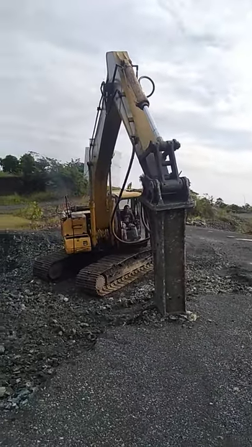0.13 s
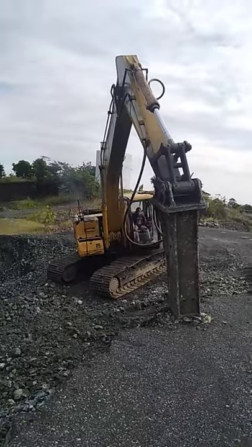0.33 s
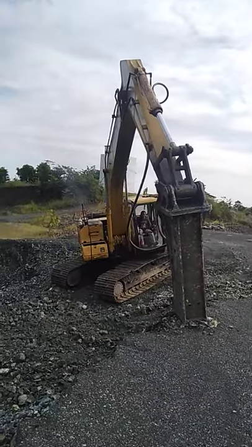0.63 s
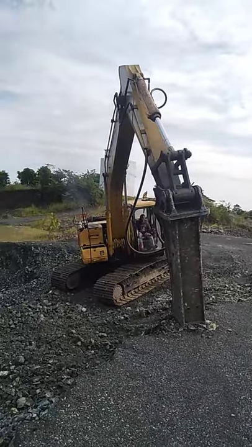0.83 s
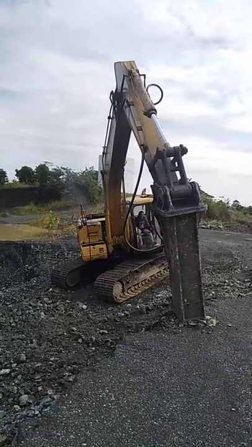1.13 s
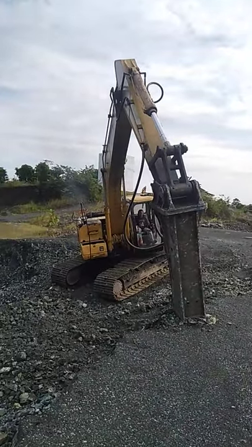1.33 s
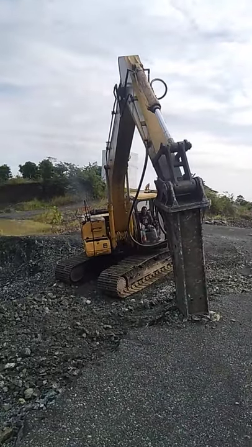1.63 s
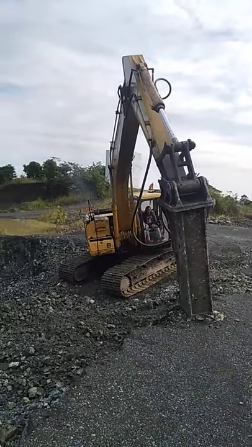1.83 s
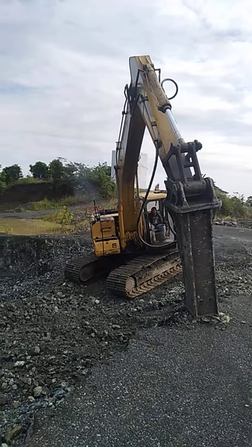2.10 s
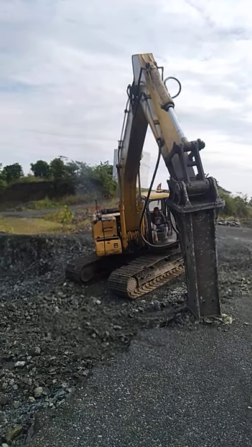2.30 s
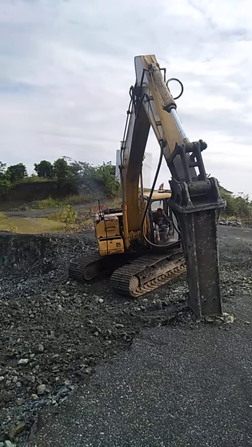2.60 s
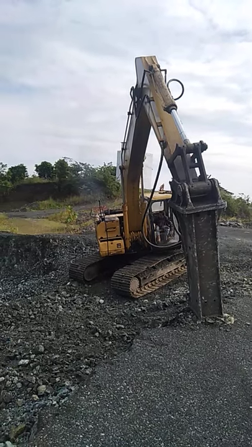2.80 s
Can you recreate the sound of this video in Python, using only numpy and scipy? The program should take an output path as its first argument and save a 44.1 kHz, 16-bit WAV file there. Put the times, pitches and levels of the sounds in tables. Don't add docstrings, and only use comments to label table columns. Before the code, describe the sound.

An excavator's breaker pounds rock about six blows a second, with one grinding skid and groan

```python
import sys
import numpy as np
from scipy import signal
from scipy.io import wavfile

SR = 44100
rng = np.random.default_rng(int(sys.argv[2]) if len(sys.argv) > 2 else 0)


def voltage_ratio(level):
    return 10 ** (np.asarray(level, float) / 20)


def wav_record(signal):
    frames = np.transpose(np.atleast_2d(signal))
    bounded = np.clip(frames, -1, 1)
    quanta = np.round(bounded * 32767).astype(np.int16)
    wavfile.write(sys.argv[1], SR, quanta)


N = 130095

# pitch_hz, density_db (per Hz)
ENGINE_COLOUR = [(15, -48), (25, -20), (197, -3), (979, 11), (1090, -47), (1560, 9.5), (2360, -0.5),
                 (4990, -67), (12000, -28), (15600, -69), (22000, -120)]
# pitch_hz, width_hz, level_db
PANELS = [(165, 42, -47), (562, 85, -47.5), (649, 72, -44), (802, 76, -44), (1220, 53, -48.5),
          (1330, 71, -53), (2253, 110, -43), (3090, 45, -53.5), (3580, 300, -54), (6980, 1040, -53),
          (4350, 280, -55)]
# multiple of the firing rate, level_db
ENGINE_ORDERS = [(1, -56), (2, -56), (4, -51.5)]
# time_s, pitch_hz, level_db
TURBO = [
    (0, 12970, -58),
    (.45, 12900, -57),
    (.6, 12800, -63),
    (1.5, 12680, -63),
    (2.2, 12720, -60),
    (2.95, 12740, -60),
]

# pitch_hz, density_db (per Hz)
VENT_COLOUR = [(880, -41), (1500, -32), (2300, -9.5), (2570, -6.5), (3580, -3.5), (5210, -46), (7440, 8.5),
               (12000, -46), (15600, -64), (22000, -120)]
# pitch_hz, width_hz, level_db
JET = [(13300, 1200, -8), (13900, 500, -3), (15300, 880, -2)]

# start_s, level_db, decay_s
DEBRIS = [
    (0.602, -29, 0.024),
    (.635, -35.5, 0.017),
    (0.797, -22.5, 0.041),
    (0.959, -22.5, 0.052),
    (1.108, -28, 0.052),
]
# pitch_hz, density_db (per Hz)
DEBRIS_COLOUR = [(120, -48), (200, -13.5), (569, 0), (641, -7.5), (1050, -6.5), (2240, -6.5), (4920, -30.5),
                 (12000, -38.5), (15600, -70), (22000, -120)]

# time_s, level_db
SLIP_LEVEL = [
    (0.611, -24.5),
    (0.626, -50),
    (0.638, -32),
    (0.66, -35),
    (0.674, -19.5),
    (0.725, -30),
    (0.772, -39),
    (0.774, -30),
]
# pitch_hz, density_db (per Hz)
SLIP_COLOUR = [(120, -46), (200, -14), (496, 5.5), (660, -12.5), (1610, -1), (1890, 0), (2860, -7),
               (3150, -6.5), (9000, -65), (11700, -68), (19800, -120)]
# pitch_hz, width_hz, level_db
SLIP_RINGS = [(702, 42, 0.5), (1140, 27, 2.5), (1876, 43, 0), (2257, 52, 1), (2910, 70, -8.5),
              (3280, 120, -21), (4160, 230, -11)]
# start_s, level_db
SKID_KNOCKS = [(.6348, -22.5), (.641, -38), (.6745, -17), (.678, -12), (.6826, -13.5), (.687, -14.5),
               (.692, -18.5), (.697, -28), (.703, -21), (.711, -23.5), (.726, -35), (.754, -31)]
# pitch_hz, level_db, delay_ms, swell_ms, t60_s
LOOSE_TOOL = [(690, -3, 0.17, 0.87, 0.026), (990, -12, 0, .6, 0.027), (1520, -10, 0, .4, 0.023),
              (1850, -1.5, 0.039, 0.35, 0.028), (2240, -6, .5, 0.44, .025), (2450, -2.5, 0, .3, 0.025),
              (2860, -4, .5, 0.33, 0.024), (3320, -18, 0.21, .2, .015), (3600, -12, 0.062, .2, .015),
              (4660, -11, 0.48, .2, 0.015)]

# pitch_hz, density_db (per Hz)
CRUNCH_COLOUR = [(35, -42), (60, -53), (208, -5.5), (493, -6.5), (1090, -10), (1490, -8), (2040, -6),
                 (4400, -26.5), (5400, -74), (12000, -50), (22000, -120)]

BLOW_S = [-.0125, .1383, .289, .4403, .5952, .797, .954, 1.1087, 1.2624, 1.4165, 1.5675, 1.7186, 1.8698,
          2.021, 2.1721, 2.3232, 2.4746, 2.6259, 2.7771, 2.9283]
# strength_db, housing_thump_db, seated_clang_db, ground_thud_db
BLOW_FORCE = [(-14.5, -43, -9, -39), (-12.5, -39, -9, -23), (-12.5, -30, -9, -24), (-13, -32, -9, -23.5),
              (-10.5, -26, -13, -19), (-12.5, -22.5, -16, -14.5), (-8, -16.5, -11.5, -12.5),
              (-9, -12.5, -9, -17), (-7.5, -15, -8.5, -14), (-8, -15.5, -8, -17), (-9.5, -16.5, -8.5, -19),
              (-8.5, -16, -6.5, -15.5), (-8, -14, -6.5, -15), (-7.5, -15, -7, -18), (-9, -13.5, -7, -16),
              (-8.5, -16.5, -8, -18.5), (-8.5, -14, -8.5, -19.5), (-9.5, -17.5, -8, -15),
              (-9, -17, -8, -20), (-9.5, -14.5, -7.5, -15)]
# after_blow_ms, level_db
BOUNCES = [
    (21, -26),
    (28, -17),
    (39, -17.5),
    (48, -17),
    (55, -36),
    (64, -22),
    (86, -31.5),
    (99, -38),
]
# pitch_hz, level_db, delay_ms, swell_ms, t60_s
SEATED_TOOL = [(715, -12, -2, 3.8, 0.06), (905, -11, 0, 3, .028), (1094, 2.5, -.2, 1.2, .045),
               (1220, -2, -.4, .3, .012), (1343, -6.5, -0.7, 0.74, 0.021), (1280, -21.5, 14, 9.5, 0.21),
               (1762, -7, 2, 2, 0.04), (2307, -11, -2.5, 1.3, 0.025), (2402, -11.5, -1, 1.3, 0.061),
               (2558, -17, 4.5, 0.97, 0.039), (3110, -19, 6.5, 1.1, 0.021), (3449, -22, -2.25, 1.7, .04),
               (3640, -21.5, 3.5, 2.6, 0.041)]
# pitch_hz, level_db, delay_ms, swell_ms, t60_s
BARE_TOOL = [(721, -9.5, -0.5, 2.6, 0.1), (1100, -3, 0.5, 0.28, 0.045), (1187, -7, 6.5, 1.4, 0.088),
             (1590, -8, 0, 0.88, 0.043), (2004, 0, 3, 0.35, 0.017), (2256, -13.5, 0.8, 0.35, 0.12),
             (2640, 4.5, .8, .2, .027), (2850, -6, .8, .2, .012), (2400, -8, 3, 1, .03),
             (1000, 3, .3, .05, .005), (3900, -7, .5, .05, .004), (3520, -23, 0.5, 0.38, 0.092),
             (4200, -21.5, 4.5, 0.37, 0.061)]
# pitch_hz, level_db, delay_ms, swell_ms, t60_s
HOUSING_THUMP = [(167, -12, 5, 6.6, 0.2), (315, .5, -3.5, 2.5, 0.042), (365, -10, -7, 1.35, 0.025)]
# pitch_hz, level_db, delay_ms, swell_ms, t60_s
GROUND_THUD = [(75, -16, -1.5, 4.4, 0.079), (197.6, -3, 5, 1.56, 0.073)]
# pitch_hz, level_db, delay_ms, swell_ms, t60_s
BOOM_KNOCK = [(445.4, -12.5, -5, 4.3, 0.057), (535, -25.5, -7, 0.98, 0.029)]


def rms_one(x):
    return x / np.sqrt(np.mean(x ** 2) + 1e-20)


def drift(rate_hz):
    r = np.exp(-80 * np.pi * rate_hz / SR)
    warm_up = 2000
    white = rng.standard_normal(N // 40 + 2 + warm_up)
    slow = signal.lfilter([1], [1, -2 * r, r * r], white)[warm_up:]
    return np.interp(np.arange(N) / 40, np.arange(len(slow)), rms_one(slow))


def coloured(points, patchy_db):
    hz, db = np.transpose(points)
    edges = 22 * 2 ** np.arange(0, 9.6, 0.5)
    white = rng.standard_normal((2, N))
    out = 0
    for k, (low, high) in enumerate(zip(edges, edges[1:])):
        band_filter = signal.butter(2, [low, high], "band", fs=SR, output="sos")
        band = signal.sosfilt(band_filter, white[k % 2])
        level_db = np.interp(np.log(low * high) / 2, np.log(hz), db, -60)
        out = out + band * voltage_ratio(level_db + patchy_db * drift(14.7))
    return rms_one(out)


def resonant(peaks):
    out = 0
    for hz, width_hz, db in peaks:
        r = np.exp(-np.pi * width_hz / SR)
        poles = [1, -2 * r * np.cos(2 * np.pi * hz / SR), r * r]
        ringing = signal.lfilter([1, 0, -1], poles, rng.standard_normal(N))
        out = out + voltage_ratio(db) * rms_one(ringing)
    return out


def strike(modes, start_s, gain, scatter_db):
    pad = SR
    out = np.zeros(N + 2 * pad)
    chance = rng.standard_normal((len(start_s), len(modes)))
    for k, (hz, db, delay_ms, swell_ms, t60_s) in enumerate(modes):
        clicks = np.zeros(N + 2 * pad) + 1e-18
        at = ((start_s + delay_ms / 1000) * SR).astype(int) + pad
        np.add.at(clicks, at, gain * voltage_ratio(db + scatter_db * chance[:, k]))
        soft = np.exp(-1000 / (abs(swell_ms) + 0.17) / SR)
        pole = voltage_ratio(-60 / (t60_s * SR)) * np.exp(2j * np.pi * hz / SR)
        out += signal.lfilter([1 - soft], np.poly([pole, pole * soft]), clicks).imag
    return out[pad:pad + N]


def blow_table():
    start_s = np.array(BLOW_S)
    strength, thump, clang, thud = voltage_ratio(np.transpose(BLOW_FORCE))
    settle_from_s, settle_to_s = 0.45, 0.8
    seat = np.clip((start_s - settle_from_s) / (settle_to_s - settle_from_s), 0, 1)
    return start_s, strength, seat, thump, clang, thud


def per_blow(shape):
    lead = SR // 5
    one = shape(np.arange(-lead, SR // 3) / SR)
    out = np.zeros(N + 2 * SR)
    for at_s, gain in zip(*blow_table()[:2]):
        start = int(at_s * SR) + SR - lead
        out[start:start + len(one)] += gain * one
    return out[SR:SR + N]


def peak(t, rise_s, decay_s):
    return np.exp(np.where(t < 0, t / rise_s, -t / decay_s))


def engine():
    t = np.arange(N) / SR
    firing_hz, firing_depth = 41.67, 0.19
    turn = 2 * np.pi * firing_hz * t + 0.42 * drift(0.93)
    noise = voltage_ratio(-44.5) * coloured(ENGINE_COLOUR, patchy_db=1.5) + resonant(PANELS)
    body = noise * (1 + firing_depth * np.cos(turn))
    hum = sum(voltage_ratio(db + 2.7 * drift(1.3)) * np.sin(k * turn) for k, db in ENGINE_ORDERS)
    return body + hum


def turbo():
    t = np.arange(N) / SR
    time_s, hz, db = np.transpose(TURBO)
    width_hz = 45
    pole = np.exp(-np.pi * width_hz / SR)
    wobble = signal.lfilter([1], [1, -pole], rng.standard_normal((2, N)))
    carrier = np.exp(2j * np.pi * np.cumsum(np.interp(t, time_s, hz)) / SR)
    whistle = carrier * (wobble[0] + 1j * wobble[1])
    return voltage_ratio(np.interp(t, time_s, db) + 1.1 * drift(7.1)) * rms_one(whistle.real)


def valve():
    lead_s, rise_s, decay_s = 0.063, 0.0034, 0.016
    stroke_rise_s, stroke_decay_s = 0.011, 0.016

    def flip(t):
        since = t + lead_s
        return (1 - np.exp(-np.maximum(since, 0) / rise_s)) * np.exp(-np.abs(since) / decay_s)

    def hiss_shape(t):
        return voltage_ratio(-38.5) * flip(t) + voltage_ratio(-37) * peak(t, stroke_rise_s, stroke_decay_s)

    def jet_shape(t):
        stroke = peak(t, 2.9 * stroke_rise_s, stroke_decay_s)
        return voltage_ratio(-42.5) * flip(t) ** 1.7 + voltage_ratio(-50.5) * stroke

    def pipe_shape(t):
        return voltage_ratio(-39.5) * flip(t) + voltage_ratio(-37.5) * peak(t + 0.0065, 0.0091, 0.01)

    mean = blow_table()[1].mean()
    jet_top = signal.ellip(6, 1, 50, 11700, "high", fs=SR, output="sos")
    jet = rms_one(signal.sosfilt(jet_top, resonant(JET)))
    pipe = per_blow(pipe_shape) / mean * resonant([(2370, 200, 0)])
    hiss = per_blow(hiss_shape) / mean * coloured(VENT_COLOUR, patchy_db=-1.5)
    leak = voltage_ratio(-59.5)
    return pipe + hiss + (per_blow(jet_shape) / mean + leak) * jet * voltage_ratio(2.3 * drift(60))


def debris():
    t = np.arange(N) / SR
    spray = sum(voltage_ratio(db) * peak(t - start_s, 0.008, decay_s) for start_s, db, decay_s in DEBRIS)
    grains = voltage_ratio(4.1 * drift(280))
    return spray * grains * coloured(DEBRIS_COLOUR, patchy_db=2.0)


def boom_groan():
    t = np.arange(N) / SR
    level = 2 * voltage_ratio(-25.5 + 2 * drift(45))
    tone = np.sin(2 * np.pi * 735 * t + 1.1 * drift(45))
    return level * tone * peak(t - 0.707, 0.0029, 0.042)


def slip():
    t = np.arange(N) / SR
    time_s, db = np.transpose(SLIP_LEVEL)
    rough = coloured(SLIP_COLOUR, patchy_db=4.0) + voltage_ratio(1) * rms_one(resonant(SLIP_RINGS))
    groan = boom_groan()
    grind = voltage_ratio(np.interp(t, time_s, db, -90, -90) - 3.5 + 2.2 * drift(150)) * rough
    hard_knock = strike(BOOM_KNOCK, np.array([0.598]), voltage_ratio(-9), 0.91)
    knock_s, knock_db = np.transpose(SKID_KNOCKS)
    knocks = strike(LOOSE_TOOL, knock_s, voltage_ratio(knock_db), 2.6)
    return grind + groan + hard_knock + knocks


def crunch():
    rush_s = 0.007
    noise = coloured(CRUNCH_COLOUR, patchy_db=4.5)

    def shape(t):
        crush = voltage_ratio(-13.5) * peak(t, rush_s, 0.012)
        tail = voltage_ratio(-28.5) * peak(t, rush_s, 0.053)
        rattle = voltage_ratio(-27.5) * np.exp(-((t - 0.052) / 0.0033) ** 2)
        return crush + tail + rattle

    def same_grit(t):
        return shape(t) * np.interp(t + 1, np.arange(N) / SR, noise)

    return per_blow(same_grit) + voltage_ratio(-6) * per_blow(shape) * noise[::-1]


def steel():
    start_s, gain, seat, thump, clang, thud = blow_table()
    after_ms, db = np.transpose([(0, 0)] + BOUNCES)
    mode_scatter_db, bounce_scatter_db, bounce_jitter_ms = 1.1, 0.5, 0.3
    jitter_ms = (after_ms > 0) * bounce_jitter_ms * rng.standard_normal((len(start_s), len(after_ms)))
    contact_s = (start_s[:, None] + (after_ms + jitter_ms) / 1000).ravel()
    scatter_db = np.tile(np.where(after_ms > 0, bounce_scatter_db, mode_scatter_db), len(start_s))
    out = 0
    for modes, force in ((SEATED_TOOL, clang * (seat > 0)), (BARE_TOOL, gain * (1 - seat) ** 2)):
        out = out + strike(modes, contact_s, (force[:, None] * voltage_ratio(db)).ravel(), scatter_db)
    for modes, force in ((HOUSING_THUMP, thump), (GROUND_THUD, thud), (BOOM_KNOCK, gain)):
        out = out + strike(modes, start_s, force, mode_scatter_db)
    return out


def scene():
    breaker = steel() + crunch() + debris() + valve() + slip()
    return (breaker + engine() + turbo())[None]


def band_limit(x):
    return signal.sosfilt(signal.butter(12, 16580, fs=SR, output="sos"), x)


def record(dry):
    limit = 0.46
    rounded = limit * np.tanh(dry / limit)
    top_cut = signal.ellip(10, 0.5, 70, 15740, fs=SR, output="sos")
    mix = signal.sosfilt(top_cut, rounded)
    return band_limit(mix)


dry = scene()
out = record(dry)
wav_record(out)
```